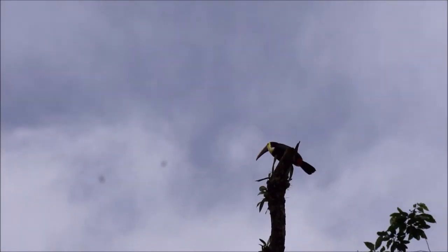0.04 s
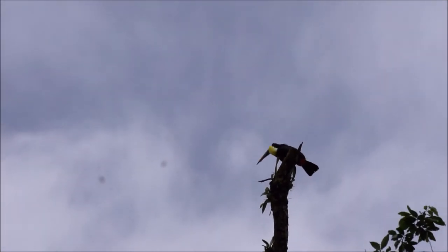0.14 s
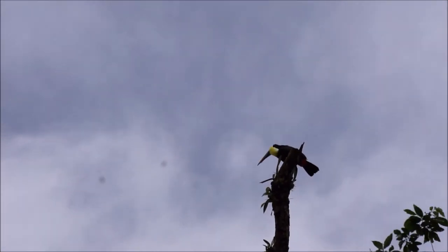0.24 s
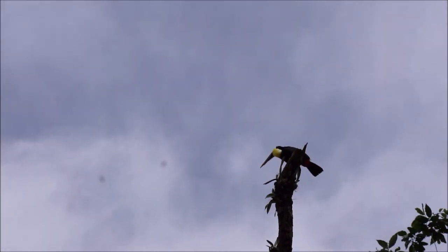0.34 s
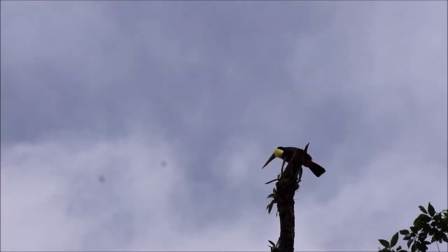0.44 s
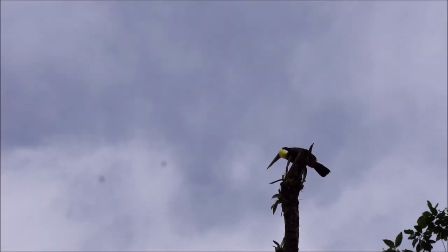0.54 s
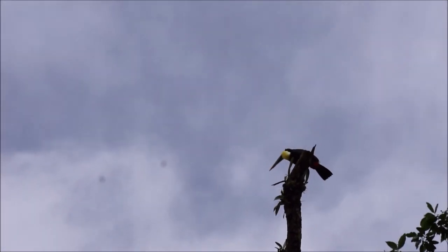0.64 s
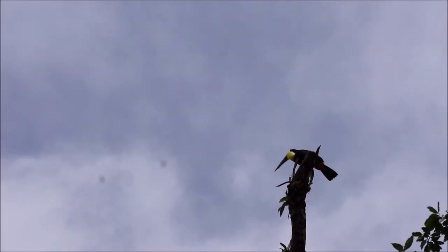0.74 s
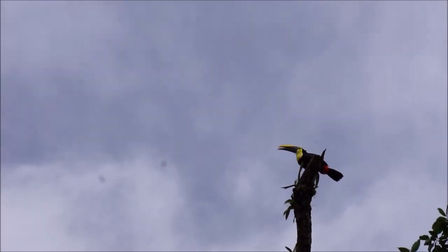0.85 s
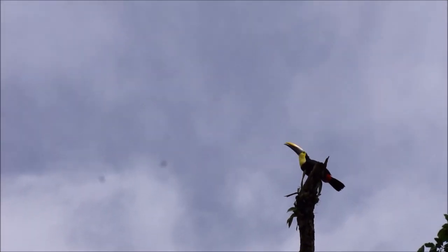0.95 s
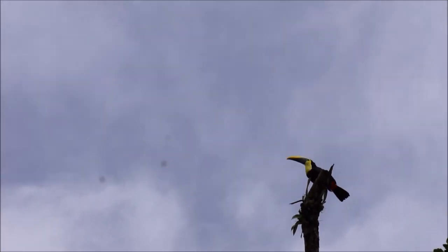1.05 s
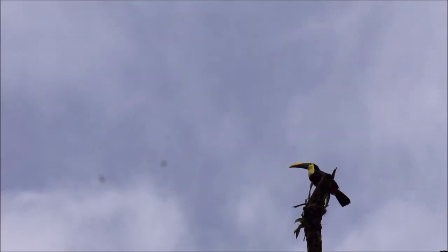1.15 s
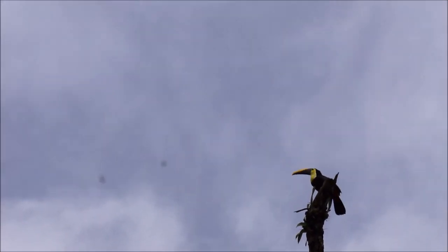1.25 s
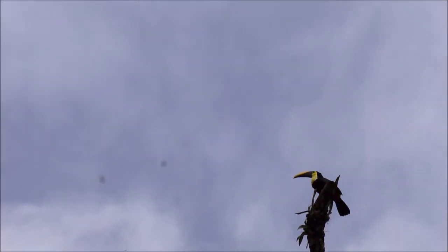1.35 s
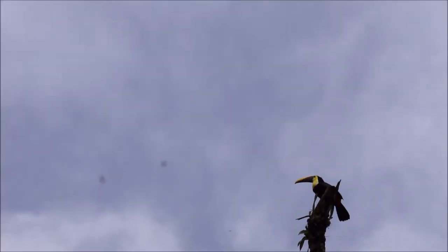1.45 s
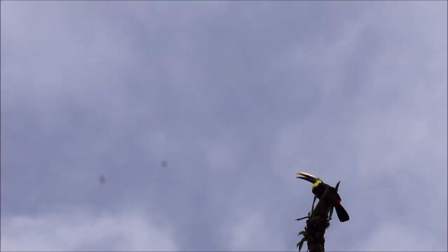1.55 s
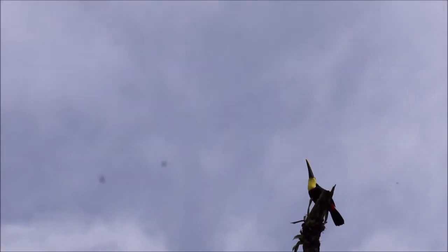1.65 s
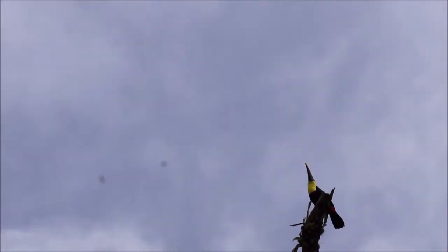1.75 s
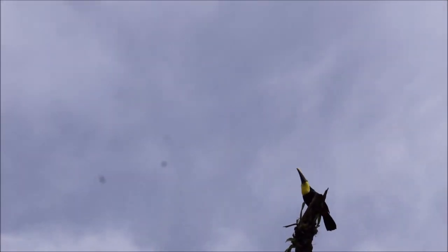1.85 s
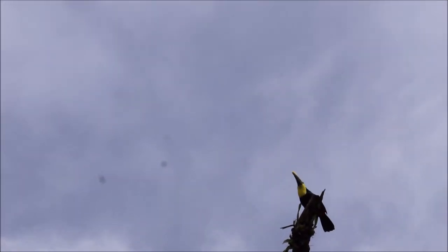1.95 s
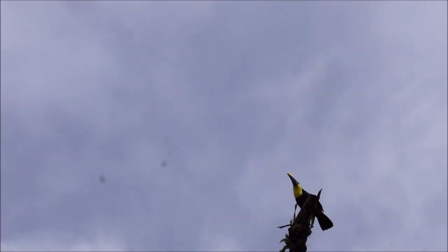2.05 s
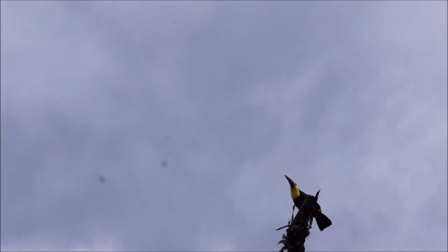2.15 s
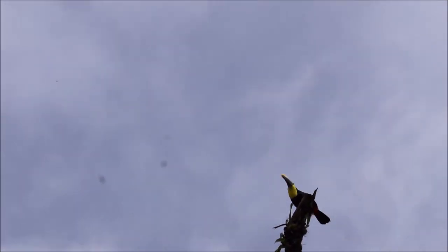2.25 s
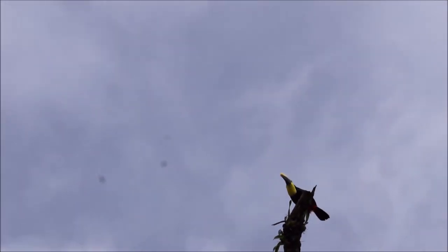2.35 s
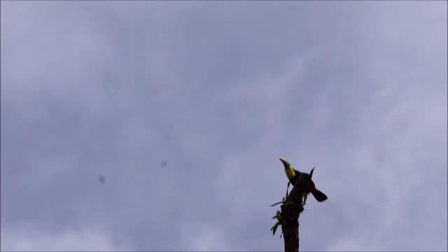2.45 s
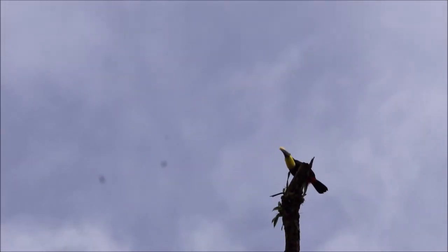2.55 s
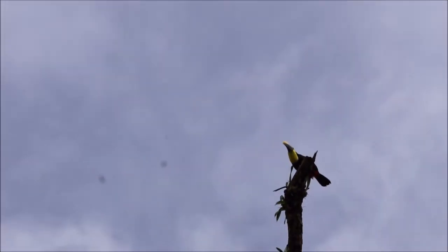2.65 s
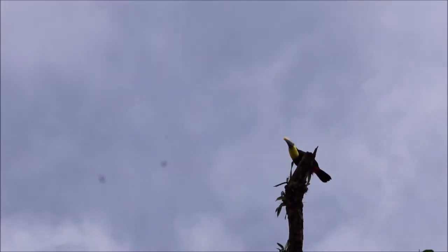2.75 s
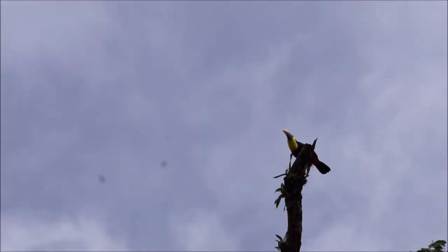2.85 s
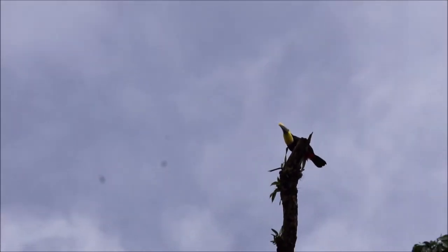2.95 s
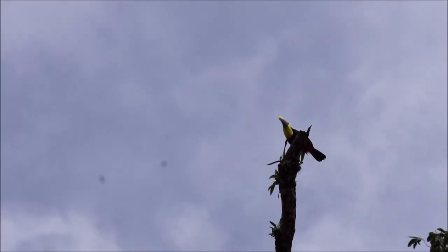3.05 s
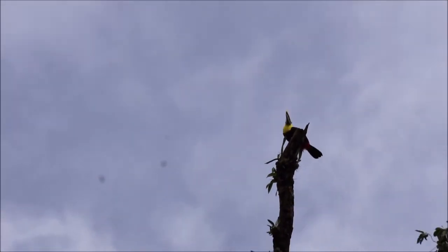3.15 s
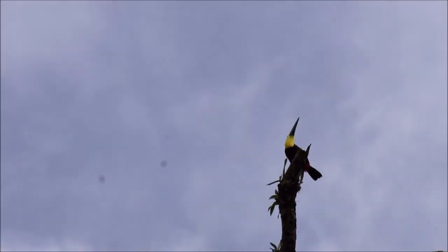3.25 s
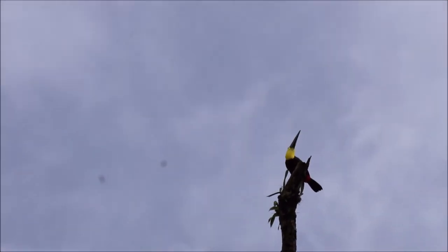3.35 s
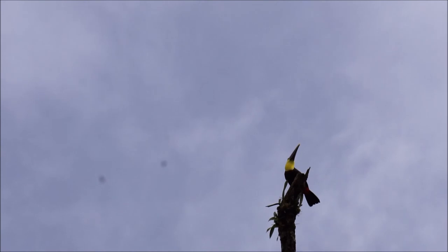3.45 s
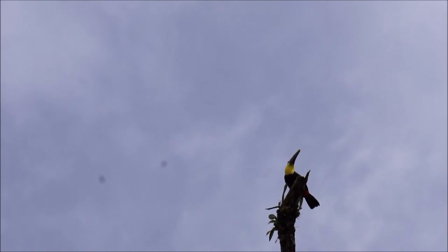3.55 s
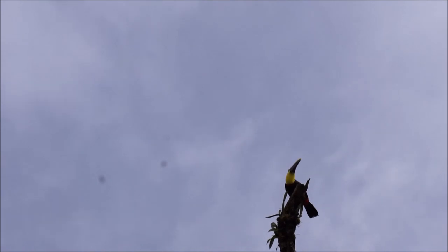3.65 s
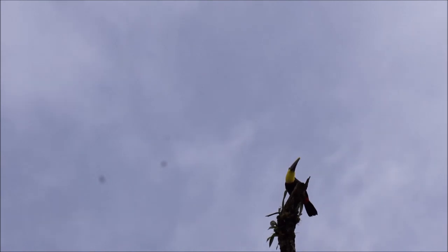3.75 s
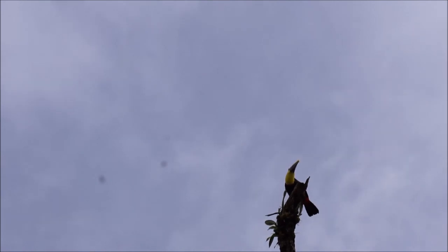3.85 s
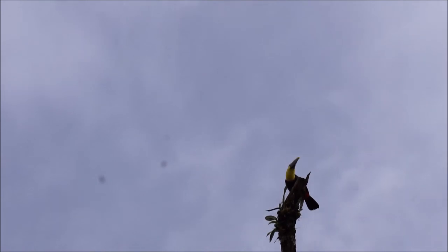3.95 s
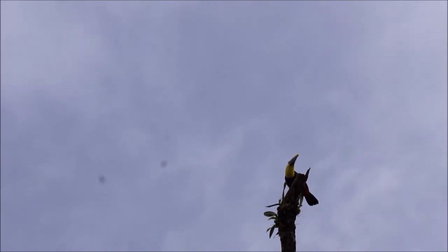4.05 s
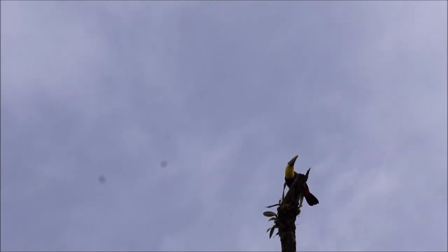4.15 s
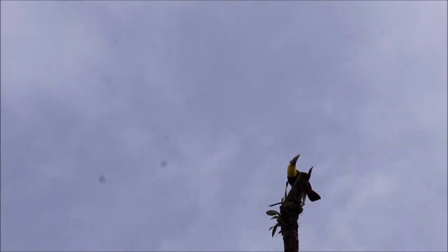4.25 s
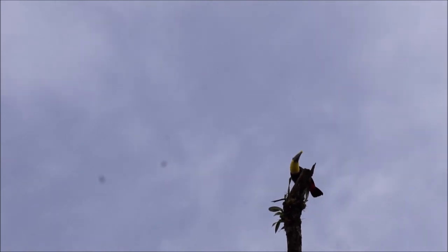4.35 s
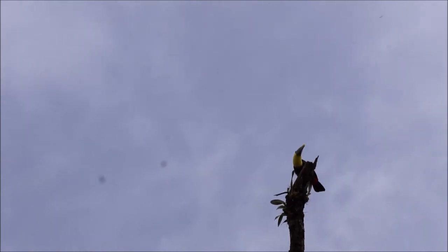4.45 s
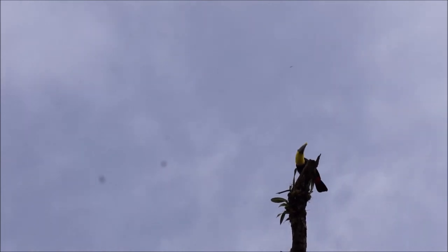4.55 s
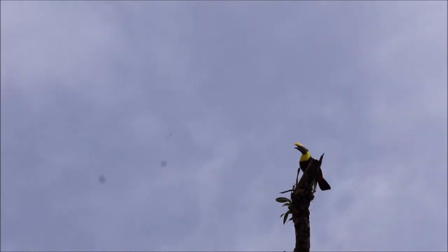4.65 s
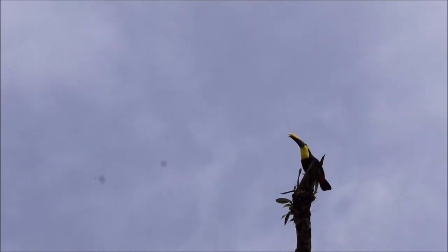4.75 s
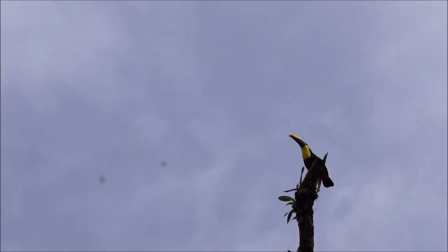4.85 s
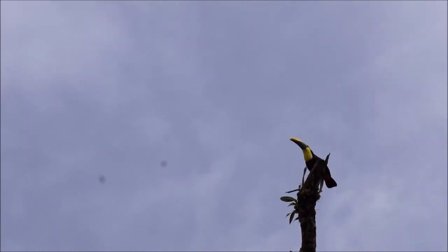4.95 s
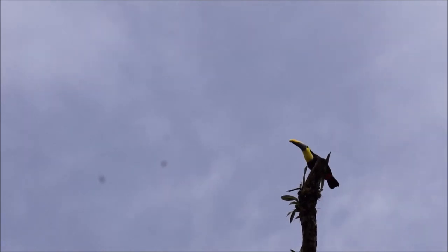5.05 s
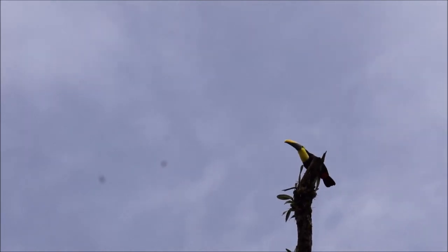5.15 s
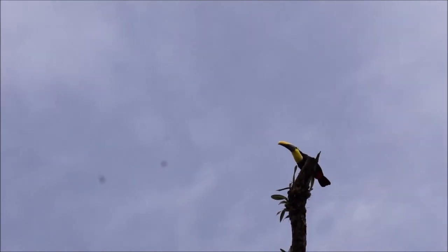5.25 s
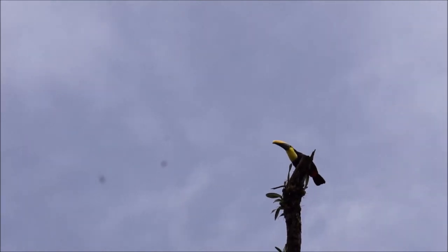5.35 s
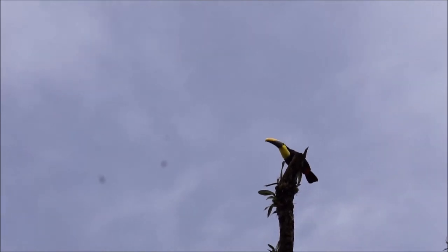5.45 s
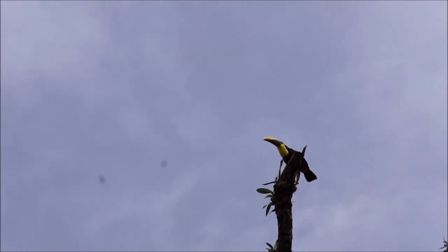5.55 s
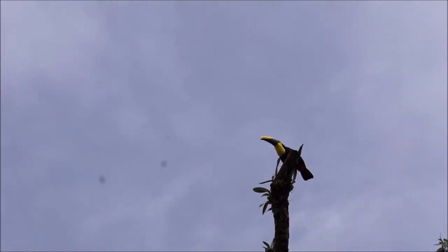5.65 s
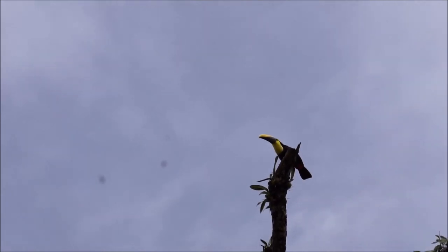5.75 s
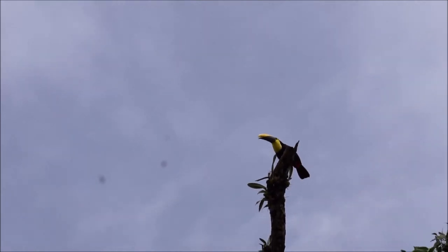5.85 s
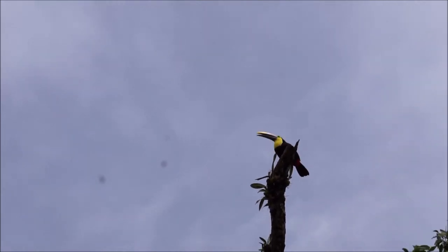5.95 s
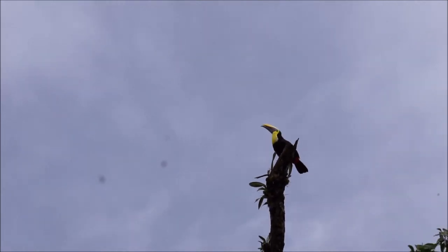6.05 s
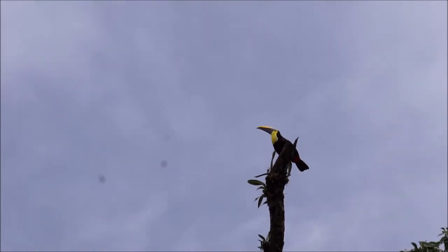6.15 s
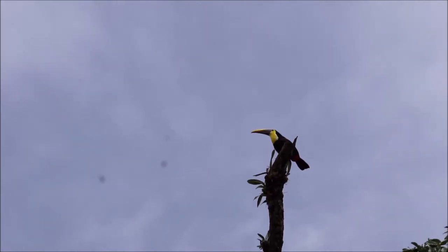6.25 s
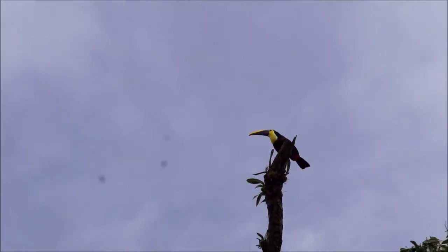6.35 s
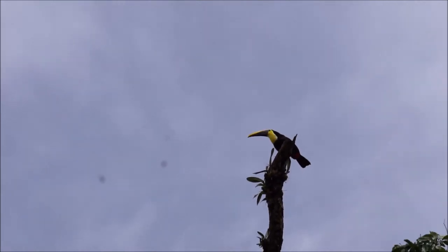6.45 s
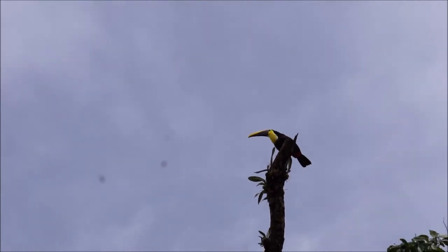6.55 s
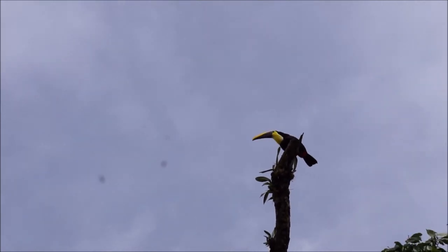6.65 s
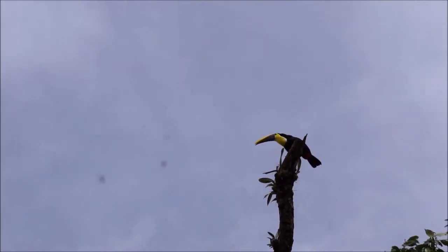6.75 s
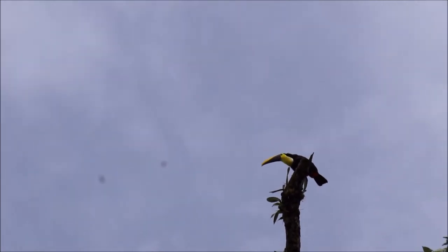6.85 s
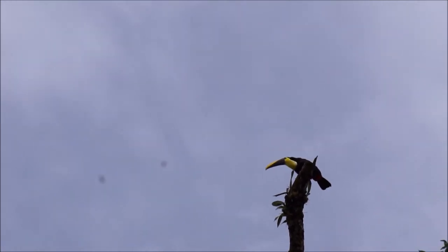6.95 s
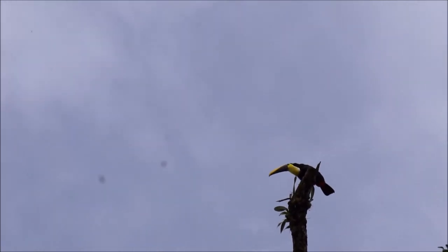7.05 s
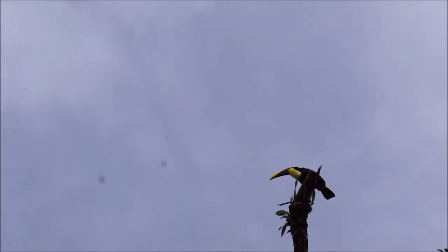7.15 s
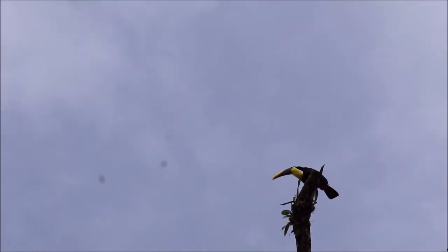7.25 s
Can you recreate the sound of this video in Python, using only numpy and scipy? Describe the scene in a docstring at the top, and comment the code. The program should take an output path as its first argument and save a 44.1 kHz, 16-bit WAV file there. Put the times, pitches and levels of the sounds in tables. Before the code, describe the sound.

A toucan calls from a treetop in a breezy tropical forest, over soft leaf hiss and a faint high insect chorus that comes and goes. Two short yelps at 0.2 seconds lead to a longer cry at 0.9, scooping up, then breaking to a lower pitch. More long cries come at 1.7, 3.3, 4.8 and 6.0, with short yelps at 1.9, 2.4, 3.7 to 3.9, 5.1, 6.3 and 6.8. All ring in dense tree echo. A blurred distant warble sounds from 0.5 to 1.4; sharp high chips flick at 2.2 and 2.9 to 3.0. A faint far toucan is heard near 1.9, 4.7 and 5.8. Bassy wind thumps the microphone, growing from 2.0, hardest at 3.0, easing in the middle, and returning strongly from 6.8 to the end at 7.3, with two dull knocks near 7.0.

```python
"""Toucan above a tropical forest

A toucan yelps from a bare treetop, answered from afar: gliding stacks of sines and single tones.
A small bird's chips are swept tones; a far warble is tones multiplied by random flutter.
Dense noise echoes from the trees smear every note.
Leaves and insects hiss as coloured noise; wind buffets two microphone ports as lumpy noise plus
single swings; two dull knocks are damped sines.
"""
import sys
import numpy as np
from scipy import signal
from scipy.fft import rfft, irfft, next_fast_len
from scipy.io import wavfile

SR = 44100
rng = np.random.default_rng(int(sys.argv[2]) if len(sys.argv) > 2 else 0)


def pcm_store(signal):
    """Save signal as 16-bit PCM."""
    levels = np.round(np.clip(np.atleast_2d(signal), -1, 1) * 32767)
    wavfile.write(sys.argv[1], SR, levels.astype(np.int16).T)


N = 322371


def from_db(db):
    """Decibels to gain."""
    return 10 ** (np.asarray(db) / 20)


def rms_one(x):
    """Scale to rms 1."""
    return x / np.sqrt(np.mean(x ** 2) + 1e-20)


def in_time(rows):
    """Columns of a time curve, one value a sample."""
    time_s, *columns = np.transpose(rows)
    return [np.interp(np.arange(N) / SR, time_s, column) for column in columns]


def at_hz(points, hz):
    """Read a spectrum table on a log-frequency axis."""
    table_hz, values = np.transpose(points)
    return np.interp(np.log(np.maximum(hz, 1)), np.log(table_hz), values)


def drift(rate_hz):
    """Slow random curve of rms 1: noise through two equal poles at SR / 40, then interpolated."""
    step = 40
    pole = np.exp(-2 * np.pi * rate_hz * step / SR)
    noise = rng.standard_normal(N // step + 2002)
    slow = signal.lfilter([1], [1, -2 * pole, pole ** 2], noise)[2000:]   # skip the settling
    return np.interp(np.arange(N) / step, np.arange(len(slow)), rms_one(slow))


def coloured(spectrum):
    """Noise of a given spectrum, rms 1."""
    size = next_fast_len(N)
    shape = from_db(at_hz(spectrum, np.fft.rfftfreq(size, 1 / SR)))
    return rms_one(irfft(rfft(rng.standard_normal(size)) * shape, size)[:N])


def sing(notes, partials, fade_s, tremble_db=0):
    """Gliding sine stacks; partials() turns a note's level columns into one dB curve per multiple."""
    out = np.zeros(N)
    # moving air and near leaves: three flickers shared out among the partials
    air_db = [tremble_db * drift(45) for _ in range(3)]
    for note in notes:
        time_s, pitch_hz, *levels_db = np.transpose(note)
        at = np.arange(round(time_s[0] * SR), round(time_s[-1] * SR))
        t = at / SR
        phase = 2 * np.pi * np.cumsum(np.interp(t, time_s, pitch_hz)) / SR
        edge = np.clip(np.minimum(t - time_s[0], time_s[-1] - t) / fade_s, 0, 1)
        for k, level_db in enumerate(partials(*levels_db), 1):
            gain = from_db(np.interp(t, time_s, level_db) + air_db[k % 3][at])
            out[at] += np.sqrt(2) * edge * gain * np.sin(k * phase)
    return out


HISS_DB, SINK_S, CREEP_BACK_S = -25, 0.061, 1.08
# abrupt dips of the forest hiss, depth before recovery: start_s, depth_db
HISS_DIPS = [(1.0, 1), (1.72, 6.5), (3.26, 6), (4.84, 2.5), (7.06, 4)]


def hiss_level_db():
    """Each dip sinks in quickly and fills up slowly."""
    start_s, depth_db = np.transpose(HISS_DIPS)
    since_s = np.maximum(np.arange(N) / SR - start_s[:, None], 0)
    sunk = np.minimum(since_s / SINK_S, 1) * np.exp(-since_s / CREEP_BACK_S)
    return HISS_DB - depth_db @ sunk


# leaf spectrum, relative: band_hz, density_db_per_hz
LEAF_SPECTRUM = [(18, -32), (30, -10), (59, -12), (345, -15.5), (437, -14.5), (822, -16), (913, -12.5),
                 (1280, -19.5), (1460, -14), (1670, -16), (3870, -20), (4780, -22.5), (5900, -19),
                 (12600, -25.5), (16000, -26.5)]
# left-right correlation of the leaves: band_hz, likeness (-1 to 1)
LEAF_LIKENESS = [(60, 0.86), (180, 1), (550, 0.78), (1650, 0.31), (4970, 0.29), (15000, -0.11)]
# side of the leaves: band_hz, left_minus_right_db
LEAF_TILT = [(60, 1), (180, -0.5), (550, 3), (1650, 2), (4970, 1.0), (15000, 0.5)]
HISS_LAG_SAMPLES = 2   # left port hears the leaves later


def hiss():
    """Leaf noise in third-octave bands, each with its own flicker, likeness and side."""
    out = 0
    edges_hz = 30 * 2 ** np.arange(0, 9.2, 1 / 3)
    white = rng.standard_normal((2, 2, N))   # neighbouring bands use different noise
    for k, (low_hz, high_hz) in enumerate(zip(edges_hz, edges_hz[1:])):
        band = signal.butter(2, [low_hz, high_hz], "band", fs=SR, output="sos")
        mid, side = signal.sosfilt(band, white[k % 2])
        hz = np.sqrt(low_hz * high_hz)
        alike = np.clip(at_hz(LEAF_LIKENESS, hz), -1, 1)
        tilt_db = at_hz(LEAF_TILT, hz) * np.array([[.5], [-.5]])
        gain = from_db(at_hz(LEAF_SPECTRUM, hz) + 0.44 * drift(8.6) + tilt_db)
        out = out + gain * (np.sqrt(1 + alike) * mid + np.sqrt(1 - alike) * side * [[1], [-1]])
    left, right = from_db(hiss_level_db()) * rms_one(out)
    return np.array([np.roll(left, HISS_LAG_SAMPLES), right])


# single eddies, peak before the membranes stiffen: start_s, peak_db, swing_hz
BUFFETS = [(0.67, -13.5, 77), (1.118, -8, 74.4), (1.592, -16, 135), (1.629, -11, 95), (1.67, -11, 105),
           (1.753, -18, 95.5), (2.149, -4, 106), (2.279, -7.5, 50), (2.335, -9, 59.6), (2.935, -17, 68),
           (3, -1.5, 108), (3.018, 0.5, 105), (3.142, -3, 83.4), (3.518, -6, 64), (3.668, -10, 54.7),
           (3.959, -13.5, 64.4), (4.203, -17.5, 94), (4.32, -11.5, 56.5), (4.462, -25, 110),
           (4.838, -16, 103), (5.277, -27, 96), (5.7, -18, 61), (5.83, -15, 50.6), (5.931, -17, 99),
           (6.761, -2.5, 81), (6.923, -4.5, 101), (6.967, -7.5, 167), (7.002, -22, 153), (7.12, 0.5, 218),
           (7.163, 2, 130.4), (7.279, -4.5, 66)]
PUFF_LENGTH_S, PUFF_DB = 0.068, (-18, -15, -15)   # swell, rumble, flutter; dB against the eddy's peak
PUFF_HZ, PUFF_DB_PER_OCTAVE = 90, (-10, -1, 3)   # quicker eddies stir flutter more, swell less


def puffs():
    """Each eddy briefly stirs the three wind layers: extra gain around its peak."""
    stirred = np.zeros((3, N))
    for start_s, peak_db, hz in BUFFETS:
        tilt_db = np.log2(hz / PUFF_HZ) * np.array(PUFF_DB_PER_OCTAVE)
        stirred[:, int((start_s + 1.2 / hz) * SR)] = from_db(peak_db + np.array(PUFF_DB) + tilt_db)
    return signal.fftconvolve(stirred, np.hanning(int(PUFF_LENGTH_S * SR))[None], "same")


def buffets():
    """An eddy swings once or twice: a sine under a bell."""
    out = np.zeros(N)
    for start_s, peak_db, hz in BUFFETS:
        cycles = np.arange(int(min(3 / hz * SR, N - start_s * SR))) * hz / SR
        bell = np.exp(-((cycles - 1.2) / .6) ** 2)
        swing = np.sin(2 * np.pi * cycles + rng.uniform(0, 2 * np.pi))
        first = int(start_s * SR)
        out[first:first + len(cycles)] += from_db(peak_db) * bell * swing
    return out


# wind on the ports, levels before puffs and lumps: time_s, swell_db, rumble_db, flutter_db
WIND = [(0.0, -41, -58, -44), (.28, -40, -43, -48), (0.85, -33, -25, -38.5), (1.4, -50, -50, -45),
        (1.575, -44, -31, -39), (1.61, -35, -17, -29), (1.71, -33, -24, -31), (1.97, -27.5, -27, -41),
        (2.1, -18, -19, -19), (2.35, -22, -20.5, -26), (2.45, -16.5, -23, -32), (2.67, -17, -16, -26.5),
        (3.03, -26, -20.5, -19), (3.25, -30, -16.5, -24.5), (3.42, -27, -29.5, -38),
        (3.57, -19, -22.5, -23), (3.76, -23, -32, -32), (3.85, -42, -45, -46), (4.05, -30, -28, -40),
        (4.78, -36, -31.5, -38.5), (4.86, -21, -22, -34.5), (5.25, -31, -43, -45), (5.45, -21.5, -26, -39),
        (6.03, -31, -29, -42), (6.15, -50, -55, -47), (6.68, -33, -50, -44), (6.771, -28, -12, -30),
        (7.039, -37, -25.5, -31), (7.12, -28, -14.5, -17), (7.31, -30, -18.5, -17.5)]
# deep swell, relative: frequency_hz, density_db_per_hz
SWELL = [(12, -35), (20, 1.5), (38, 1), (65, -3.5), (84, -33), (140, -120)]
# rumble, relative: frequency_hz, density_db_per_hz
RUMBLE = [(32, -43), (55, -4.5), (108, -0.5), (170, -11), (220, -15), (370, -120)]
# flutter, relative: frequency_hz, density_db_per_hz
FLUTTER = [(71, -40), (120, -5), (240, -5), (388, -14.5), (517, -25), (700, -34), (910, -60), (1540, -120)]
PORT_TURN_HZ = 248   # pressure reaches the left port a quarter cycle late at this frequency


def wind():
    """Three lumpy noise layers plus eddies; both ports feel nearly the same pressure, the left late."""
    lumps, push, own = drift(30.5), 0, 0
    layers = zip(in_time(WIND), puffs(), [SWELL, RUMBLE, FLUTTER], [-15, -11, -8])
    for level_db, puff, spectrum, unlike_db in layers:
        lump_db = 2.52 * lumps + 4.15 * drift(42) - 3.5
        gain = (from_db(level_db) + puff) * from_db(lump_db)
        push = push + gain * coloured(spectrum)
        own = own + gain * coloured(spectrum) * from_db(unlike_db)
    push = push + buffets()
    push = .7 * np.tanh(push / .7)   # membranes stiffen on the hardest pushes
    bend = np.tan(np.pi * PORT_TURN_HZ / SR)
    pole = (1 - bend) / (1 + bend)
    left = signal.lfilter([-pole, 1], [1, -pole], push)   # all-pass
    return np.array([left + own, push - own])


# insects come and go: time_s, level_db
INSECTS = [(0, -39), (.9, -38), (1.7, -44), (1.8, -50), (3.9, -46), (4.3, -45), (4.75, -37), (4.9, -54),
           (5.6, -39), (6.1, -60), (7.31, -59)]
# their treble band, relative: frequency_hz, density_db_per_hz
INSECT_BAND = [(5000, -20), (6000, -0.5), (6700, -1), (7500, -14), (9000, -40)]


def insects():
    """A far chorus: smooth band noise, independent in the two ports."""
    return from_db(in_time(INSECTS)[0]) * np.array([coloured(INSECT_BAND), coloured(INSECT_BAND)])


ATTACK_S, ATTACK_DB, SWELL_DB_PER_S = 0.0066, -7, (300, 53)   # rise; partials 1, 2 swell to the crest
VEILED_DB = -5.5   # partial 3 before the fall, partials 4-5 away from the crest
HOLD_AT, FALL_AT = 0.19, 0.46   # shares of the time after the crest
END_SHARE, FALL_POWER, END_DB = 0.149, 1.597, -13   # share of pitch lost at the end, steepening


def short_yelp(start_s, length_s, start_hz, crest_hz, crest_s,
               one_db, two_db, fall_one_db, fall_two_db, three_db, upper_db):
    """Quick rise, swell to the crest, brief level hold, ever steeper pitch fall."""
    crest_s = max(crest_s, ATTACK_S)
    crest_db = np.array([one_db, two_db, three_db + VEILED_DB, upper_db])
    swell_db = np.array([*SWELL_DB_PER_S, 0, 0]) * (crest_s - ATTACK_S)
    early_db = crest_db - swell_db + [0, 0, 0, VEILED_DB]
    fall_db = np.array([fall_one_db, fall_two_db, three_db, upper_db + VEILED_DB])
    attack_hz = np.interp(ATTACK_S, [0, crest_s], [start_hz, crest_hz])
    rows = [(0, start_hz, *(early_db + ATTACK_DB)), (ATTACK_S, attack_hz, *early_db)]
    after_crest = [(0, crest_db), (HOLD_AT, crest_db), (FALL_AT, fall_db),
                   ((1 + FALL_AT) / 2, fall_db + END_DB / 2), (1, fall_db + END_DB)]
    for gone, level_db in after_crest:
        pitch_hz = crest_hz * (1 - END_SHARE * gone ** FALL_POWER)
        rows.append((crest_s + gone * (length_s - crest_s), pitch_hz, *level_db))
    return [(start_s + later_s, *rest) for later_s, *rest in rows]


SCOOP_BOW = 0.628   # share of the scoop made at 40% of its time
BREAK_S, BREAK_LEAD = .042, 0.0198   # length of the break, share of pitch lost before it
TAIL_S, TAIL_DROP_HZ = 0.0278, 130   # closing fall
LONG_ONSET_DB = (-15, -8.5, -14, -13)   # partials 1, 2, 3, 4-5 at the start
LONG_SAG_DB = (-4.5, 0.5)   # partials 1, 3 over the low part
LONG_TAIL_DB = (-9, -8.5, -6)   # partials 1-3 over the tail
SHRILL_LOSS_DB = -19   # partials 3-5 from crest to break; 4-5 again over the break


def long_yelp(start_s, length_s, start_hz, high_hz, crest_s, low_s, low_hz, sag_hz_per_s,
              one_db, two_db, three_db, upper_db, break_one_db,
              low_one_db, low_two_db, low_three_db, late_two_db):
    """Scoop to the crest, break, sagging low part, closing fall."""
    high_db = np.array([one_db, two_db, three_db, upper_db])
    onset_db = np.array(LONG_ONSET_DB)
    late_db = np.array([low_one_db + LONG_SAG_DB[0], late_two_db, low_three_db + LONG_SAG_DB[1]])
    tail_start_s = length_s - TAIL_S
    sagged_hz = low_hz - sag_hz_per_s * (tail_start_s - low_s)
    faded_db = upper_db + 2 * SHRILL_LOSS_DB
    rows = [(0, start_hz, *(high_db + onset_db)),
            (.4 * crest_s, start_hz + SCOOP_BOW * (high_hz - start_hz), *(high_db + onset_db / 4)),
            (crest_s, high_hz, *high_db),
            (low_s - BREAK_S, high_hz * (1 - BREAK_LEAD),
             break_one_db, two_db, three_db + SHRILL_LOSS_DB, upper_db + SHRILL_LOSS_DB),
            (low_s, low_hz, low_one_db, low_two_db, low_three_db, faded_db),
            (tail_start_s, sagged_hz, *late_db, faded_db),
            (length_s, sagged_hz - TAIL_DROP_HZ, *(late_db + LONG_TAIL_DB), faded_db)]
    return [(start_s + later_s, *rest) for later_s, *rest in rows]


# short yelps, crest_s after the start: start_s, length_s, start_hz, crest_hz, crest_s,
# crest one_db, two_db, fall_one_db, fall_two_db, three_db, upper_db (partials 4-5)
SHORT_YELPS = [(0.169, 0.047, 1525, 1487, .008, -24.5, -23.5, -29, -22, -37, -47),
               (0.243, 0.095, 1525, 1535, 0.029, -9.5, -17.5, -20, -16, -31, -46),
               (1.92, .06, 1536, 1490, 0.0165, -16, -21, -18.5, -22.5, -27.5, -40),
               (2.403, 0.13, 1433, 1492, 0.061, -13, -14.5, -18, -20.5, -26.5, -34.5),
               (3.709, 0.052, 1500, 1496, 0.0077, -27.5, -23, -35, -20.5, -30, -37),
               (3.832, .054, 1500, 1493, 0.0069, -26, -23, -29, -12.5, -35, -40),
               (5.061, 0.037, 1517, 1474, 0.0072, -24.5, -21.5, -27, -21, -28.5, -39),
               (6.302, .07, 1904, 1937, 0.0276, -12, -23, -18.5, -20, -45, -54),
               (6.776, .061, 1490, 1487, 0.01, -25.5, -18.5, -26, -22, -39, -55),
               (6.855, 0.086, 1488, 1485, 0.025, -14, -16.5, -19, -18, -32, -50)]
# long yelps, a high part breaking to a low one, crest_s and low_s after the start:
# start_s, length_s, start_hz, high_hz, crest_s, low_s, low_hz, sag_hz_per_s,
# high one_db, two_db, three_db, upper_db (partials 4-5), break_one_db,
# low_one_db, low_two_db, low_three_db, late_two_db (before the tail)
LONG_YELPS = [(0.933, 0.22, 1703, 1782, 0.027, .1, 1491, 802, -18.5, -17, -39, -55, -17.5, -12, -26.5, -45, -21.5),
              (1.663, 0.2, 1627, 1752, 0.037, .094, 1505, 1250, -19, -14, -33, -45, -19, -16, -16, -34, -22),
              (3.253, .21, 1694, 1784, 0.029, 0.089, 1456, 488, -17.5, -13, -22, -21.5, -23, -15.5, -18.5, -36.5, -18),
              (4.796, .174, 1660, 1714, 0.021, .077, 1458, 1015, -34, -15.5, -18, -25.5, -18, -16, -25, -28, -23),
              (6.041, 0.23, 1691, 1804, 0.03, .093, 1482, 362, -21.5, -11.5, -17.5, -41, -20, -14, -33, -56, -29)]
SIXTH_DB = -10   # partial 6 against partial 5


def toucan():
    """Clear yelps of six harmonic partials."""
    def six_partials(*levels_db):
        return (*levels_db, levels_db[-1], levels_db[-1] + SIXTH_DB)

    notes = [long_yelp(*row) for row in LONG_YELPS] + [short_yelp(*row) for row in SHORT_YELPS]
    return sing(notes, six_partials, fade_s=0.0018, tremble_db=2.5)


# echo wash of near crowns and far slopes: t60_s, level_db
TREETOP_ECHO = [(.45, -4.5), (1.6, -10.5)]
# echo wash of the undergrowth around the small birds: t60_s, level_db
UNDERGROWTH_ECHO = [(.35, -1), (1.2, -30)]
TREETOP_CUT_HZ, UNDERGROWTH_CUT_HZ = 4000, 21000
ECHO_RISE_S, SWAY_S = 0.0019, .0001   # sway: rms delay change
# direct bird sound from above at the ports: frequency_hz, left_minus_right_db
BIRD_PAN = [(1500, -3), (3000, -6.5), (3600, 0.5), (5000, 4.5), (9000, -1)]
# its phase between the ports: frequency_hz, left_lead_rad
BIRD_PHASE = [(1500, -0.45), (2900, 0.76), (3600, 1), (5000, 1), (9000, 1)]
# what the crowns throw back best: frequency_hz, level_db
ECHO_COLOUR = [(1500, -1.0), (2800, 0), (3600, -1.7), (5000, 1.6)]


def forest(x, tails, cut_hz):
    """Direct sound at both ports plus a decaying noise wash of echoes, partly shared by the sides."""
    size = next_fast_len(N + SR)
    t = np.arange(SR) / SR
    decay = 0
    for t60_s, level_db in tails:
        decay = decay + from_db(level_db - 60 * t / t60_s) / np.sqrt(t60_s * SR / np.log(1e6))
    shared, own = rng.standard_normal(SR), rng.standard_normal((2, SR))
    echoes = (1 - np.exp(-t / ECHO_RISE_S)) * decay * (0.62 * shared + 0.82 * own)
    echoes = signal.lfilter(*signal.butter(2, cut_hz, fs=SR), echoes)
    # moving leaves smear the pitch
    swayed = np.interp(np.arange(N) + SWAY_S * SR * drift(21.6), np.arange(N), x)
    hz, side = np.fft.rfftfreq(size, 1 / SR), np.array([[.5], [-.5]])
    ports = from_db(at_hz(BIRD_PAN, hz) * side) * np.exp(1j * at_hz(BIRD_PHASE, hz) * side)
    direct = rfft(x, size) * ports
    wash = rfft(swayed, size) * rfft(echoes, size) * from_db(at_hz(ECHO_COLOUR, hz))
    return irfft(direct + wash, size)[:, :N]


def one_partial(level_db):
    """A pure tone."""
    return [level_db]


# far warbler, one table per note, level before flutter: time_s, pitch_hz, level_db
WHISTLES = [
    [(.55, 3740, -37), (.62, 4170, -34), (.7, 4150, -35.5), (.74, 3980, -38)],
    [(.87, 4000, -35), (.95, 4190, -30), (1.03, 4100, -39), (1.17, 4150, -38), (1.2, 4130, -31),
     (1.27, 3950, -36), (1.4, 3950, -39)],
]


def far_warbler():
    """Pure glides times fast random flutter: they arrive blurred into a band."""
    return sing(WHISTLES, one_partial, fade_s=.005) * drift(220)


# second toucan far away, one table per note: time_s, pitch_hz, level_db
FAR_YELPS = [
    [(1.912, 1910, -38), (1.922, 1985, -26), (1.935, 1940, -45)],
    [(4.71, 1884, -46), (4.74, 1830, -44), (4.81, 1857, -35), (4.83, 1830, -46)],
    [(5.8, 1845, -48), (5.83, 1840, -36.5), (5.95, 1854, -39), (6.02, 1850, -39)],
]


def far_toucan():
    """Only the fundamental, trembling slightly."""
    return sing(FAR_YELPS, one_partial, fade_s=.004, tremble_db=0.5)


BOW = .3   # share of the pitch rise made at half time
CHIP_EDGE_DB, CHIP_TOP_DB = -7, -1.5   # at the ends, at the top


def chip(start_s, rise_s, drop_s, start_hz, top_hz, end_hz, level_db):
    """Up slowly, then fast, and down again."""
    return [(start_s, start_hz, level_db + CHIP_EDGE_DB),
            (start_s + rise_s / 2, start_hz + BOW * (top_hz - start_hz), level_db),
            (start_s + rise_s, top_hz, level_db + CHIP_TOP_DB),
            (start_s + rise_s + drop_s, end_hz, level_db + CHIP_EDGE_DB)]


# near chips, a bowed rise and a quick drop:
# start_s, rise_s, drop_s, start_hz, top_hz, end_hz, level_db (mid-rise)
CHIPS = [(2.242, .008, .0005, 7500, 15300, 15000, -29), (2.246, .007, 0.0045, 5900, 10300, 5800, -21.5),
         (2.896, 0.024, .005, 7100, 10100, 7000, -23.5), (2.944, 0.018, 0.0041, 7220, 9080, 6560, -23.5),
         (3.004, 0.012, .003, 6870, 8180, 6400, -24)]


def small_bird():
    """Near chips: clean sine sweeps."""
    return sing([chip(*row) for row in CHIPS], one_partial, fade_s=.001)


# dull knocks at the microphone: start_s, peak_db (of the decay), ring_hz
KNOCKS = [(6.971, -7.5, 476), (7.0, -12, 353)]


def knocks():
    """Short damped rings of the housing."""
    out, t = np.zeros(N), np.arange(SR // 20) / SR
    for start_s, peak_db, hz in KNOCKS:
        first = int(start_s * SR)
        out[first:first + len(t)] += from_db(peak_db) * np.exp(-t / 0.0054) * np.sin(2 * np.pi * hz * t)
    return out


def scene():
    """Hiss, wind, insects, birds through the forest, knocks."""
    ambience = hiss() + wind() + insects()
    toucans = forest(toucan() + far_toucan(), TREETOP_ECHO, TREETOP_CUT_HZ)
    small_birds = forest(far_warbler() + small_bird(), UNDERGROWTH_ECHO, UNDERGROWTH_CUT_HZ)
    return ambience + toucans + small_birds + knocks()


LOW_CUT_HZ, TOP, STOP_HZ = 30, 1.03, 16340   # STOP_HZ: 80 dB down from here up


def record(dry):
    """The deepest bass is rolled off, only the highest peaks are rounded, the top is cut."""
    thin = signal.lfilter(*signal.butter(2, LOW_CUT_HZ, "high", fs=SR), dry)
    rounded = thin / (1 + (thin / TOP) ** 4) ** (1 / 4)
    return signal.sosfilt(signal.cheby2(16, 80, STOP_HZ, fs=SR, output="sos"), rounded)


dry = scene()
out = record(dry)
pcm_store(out)
```